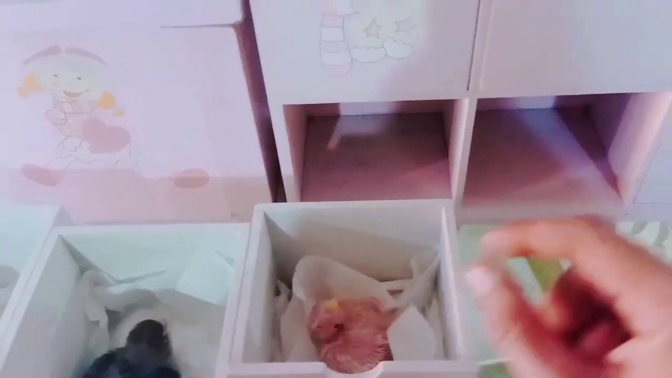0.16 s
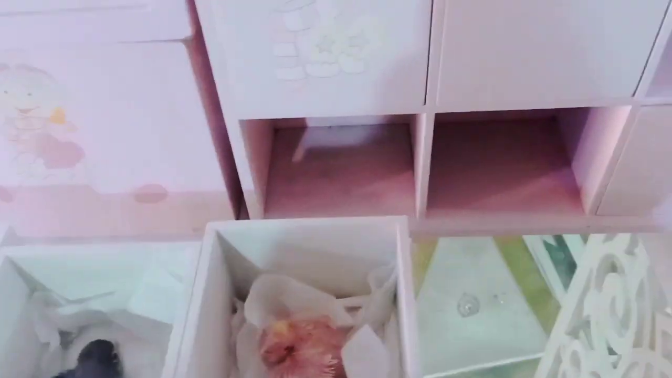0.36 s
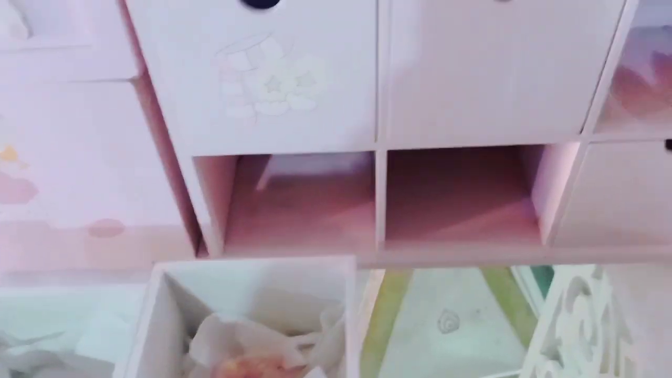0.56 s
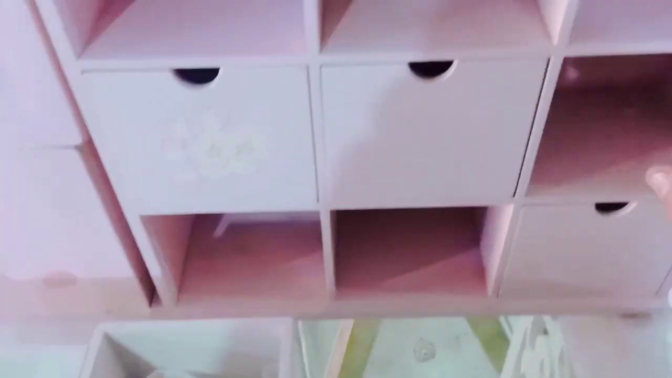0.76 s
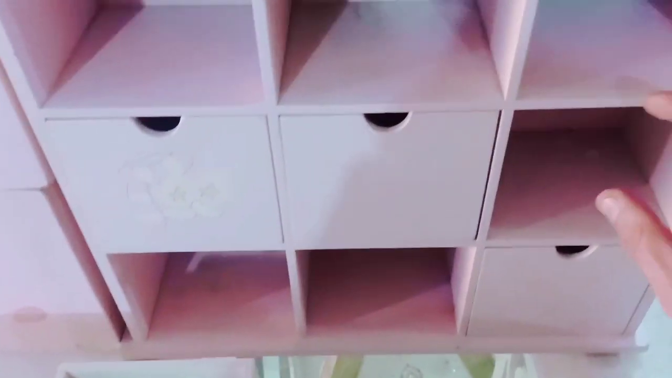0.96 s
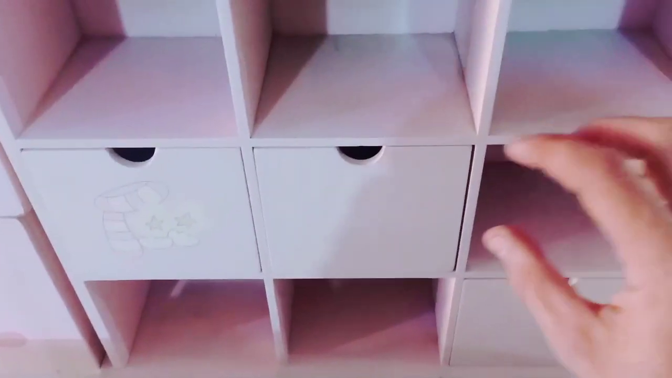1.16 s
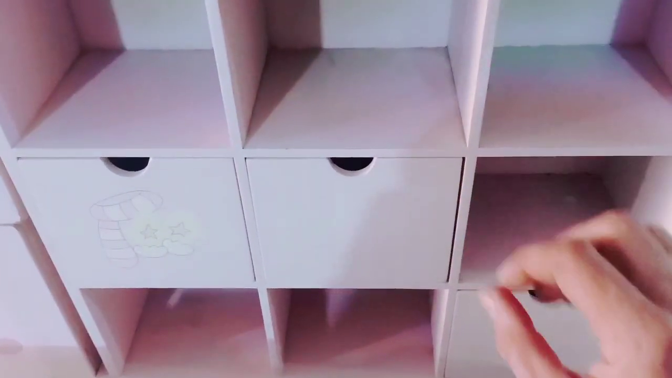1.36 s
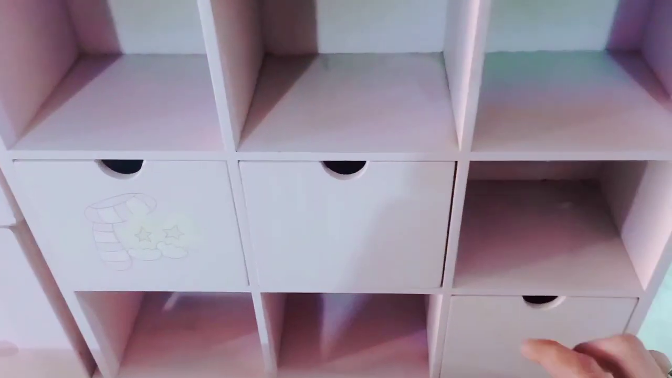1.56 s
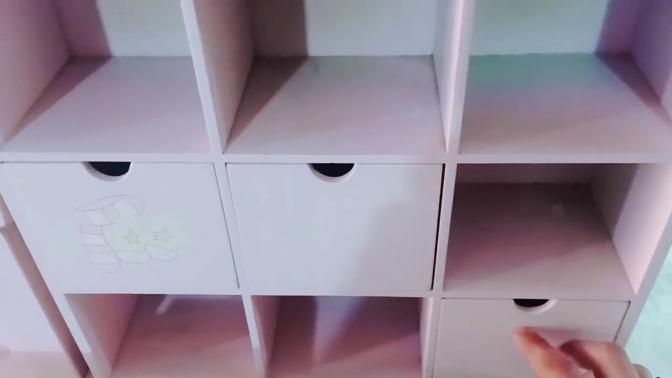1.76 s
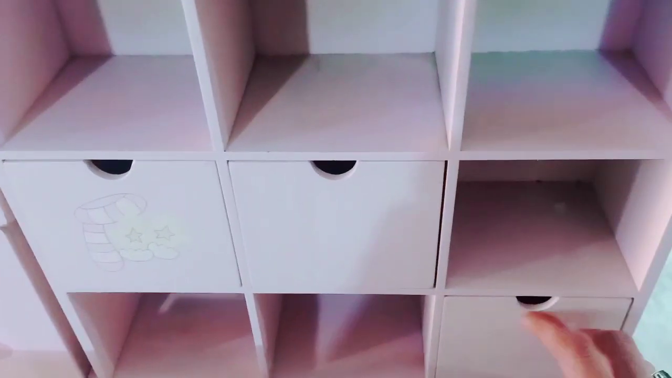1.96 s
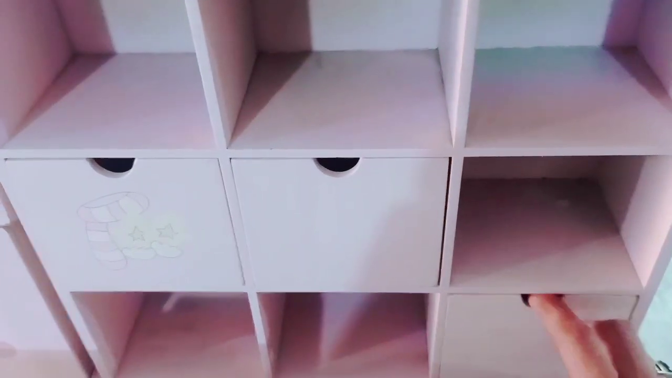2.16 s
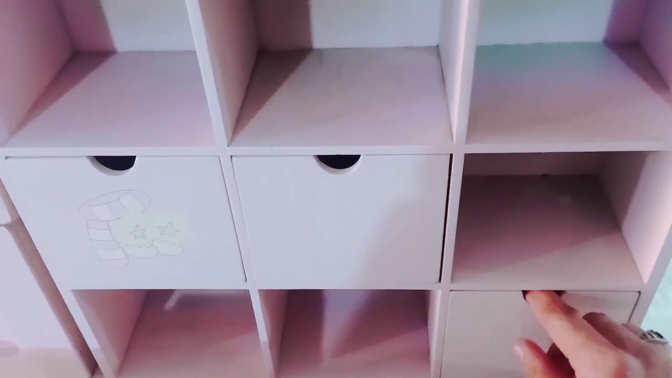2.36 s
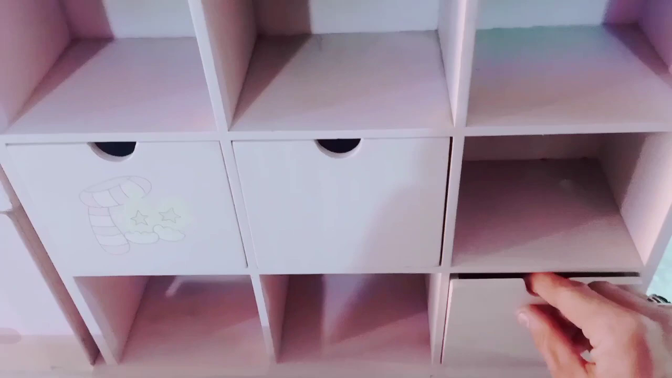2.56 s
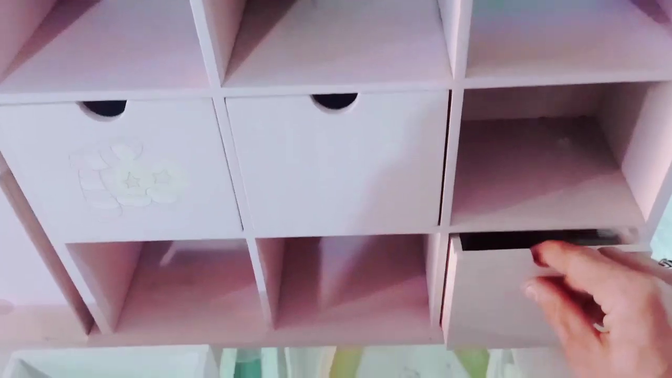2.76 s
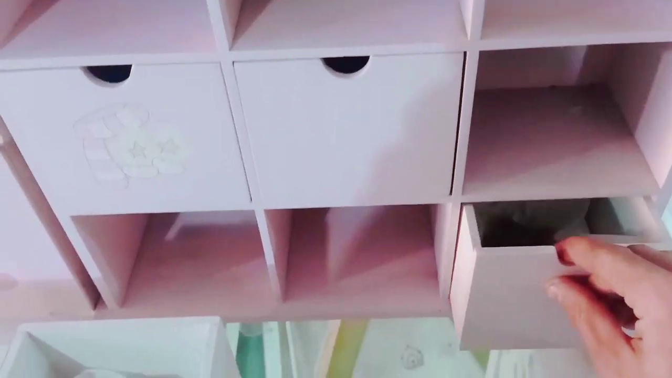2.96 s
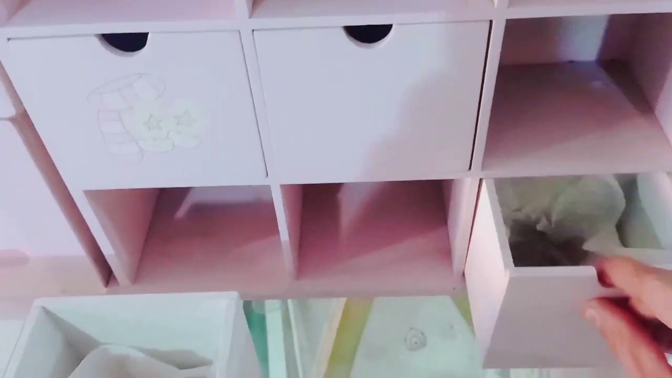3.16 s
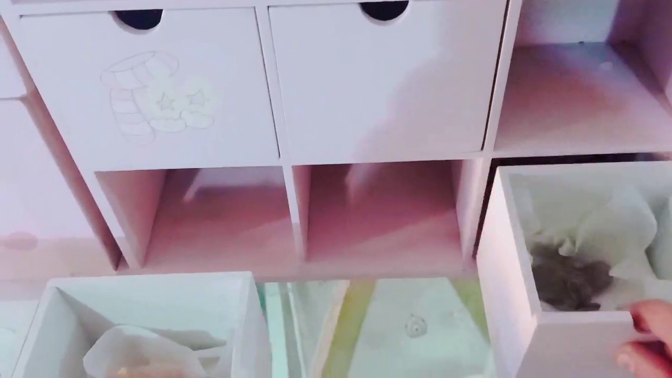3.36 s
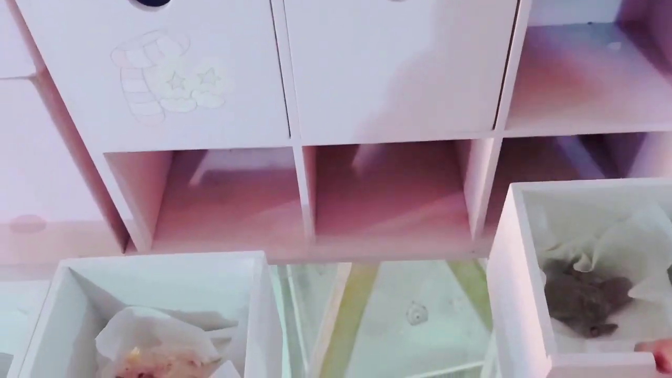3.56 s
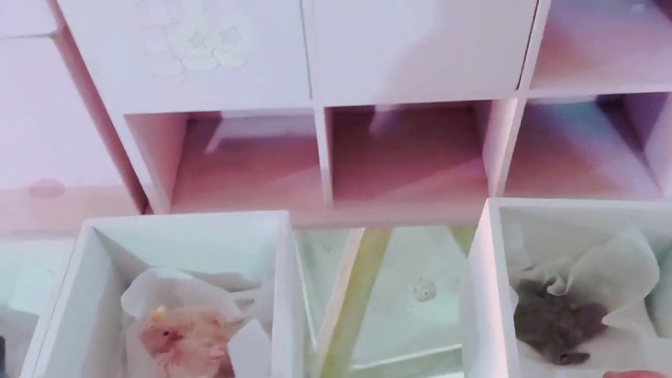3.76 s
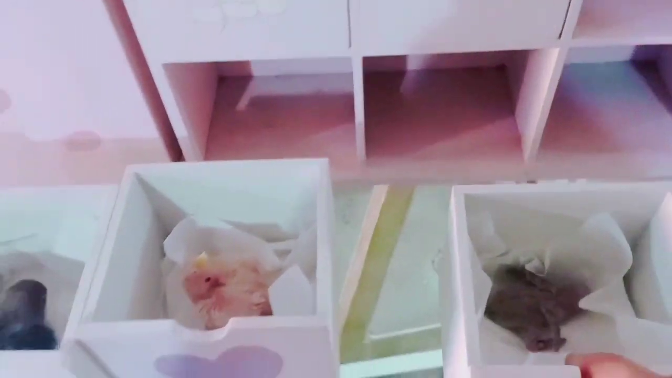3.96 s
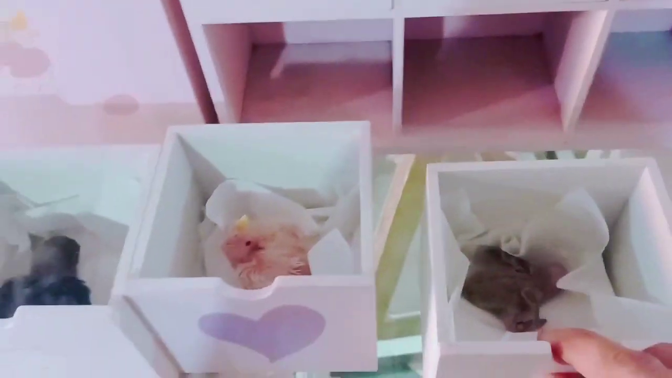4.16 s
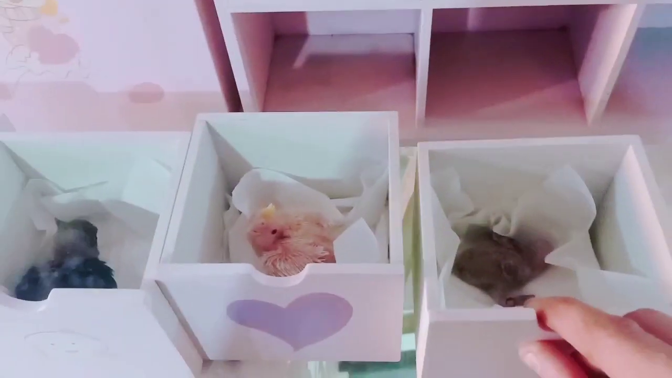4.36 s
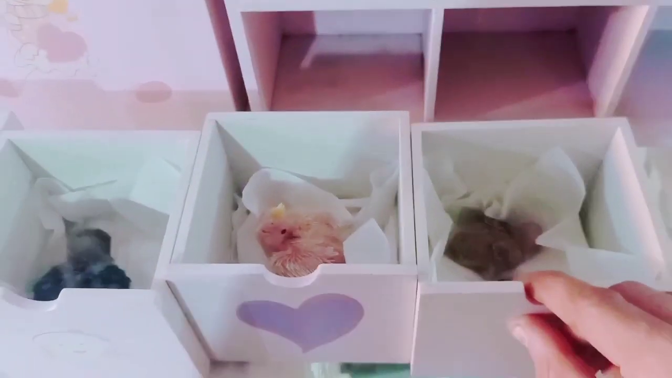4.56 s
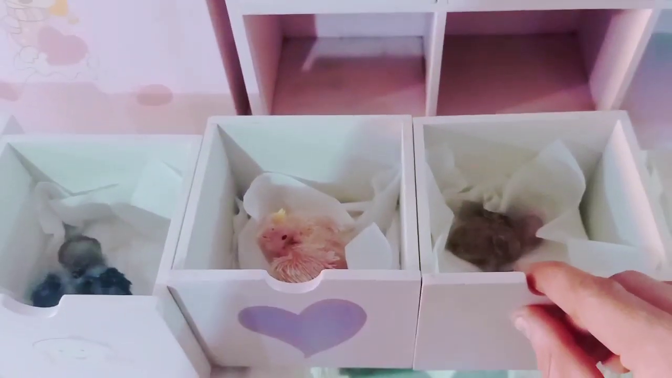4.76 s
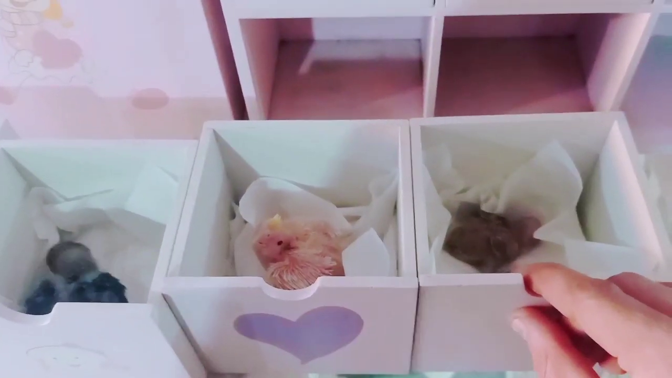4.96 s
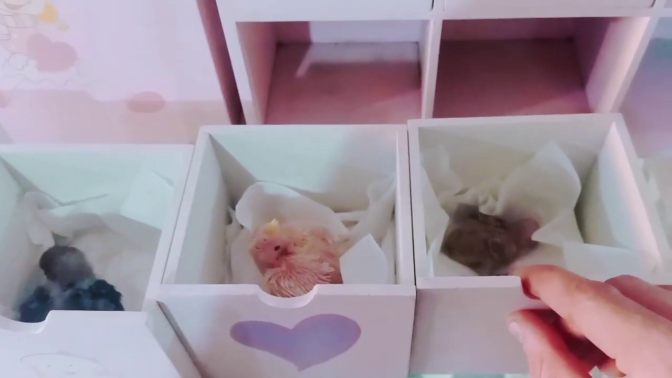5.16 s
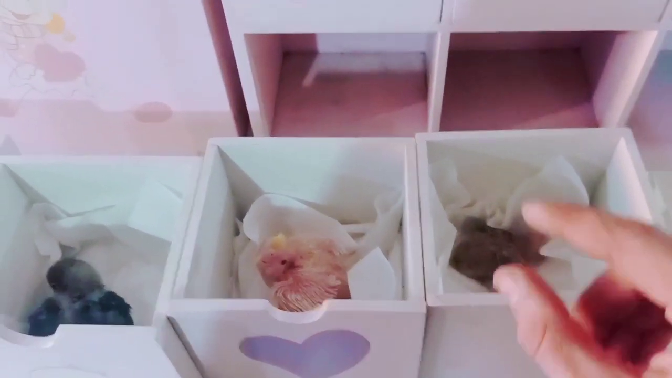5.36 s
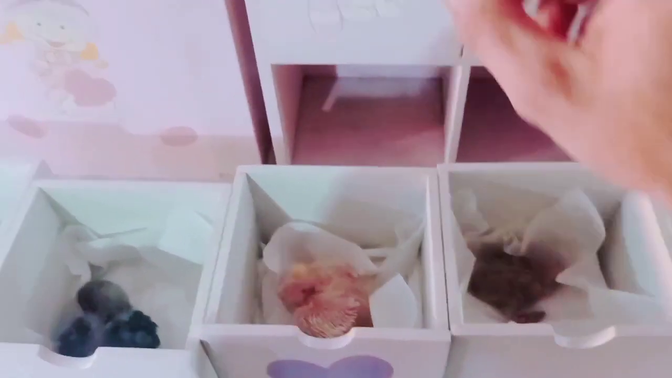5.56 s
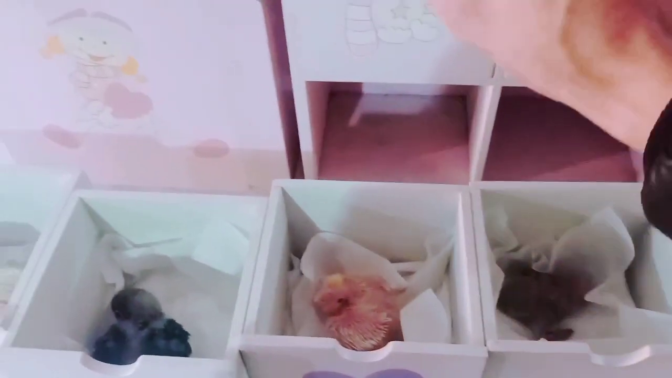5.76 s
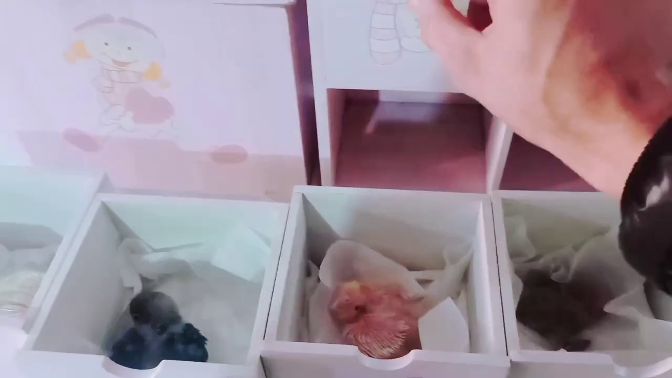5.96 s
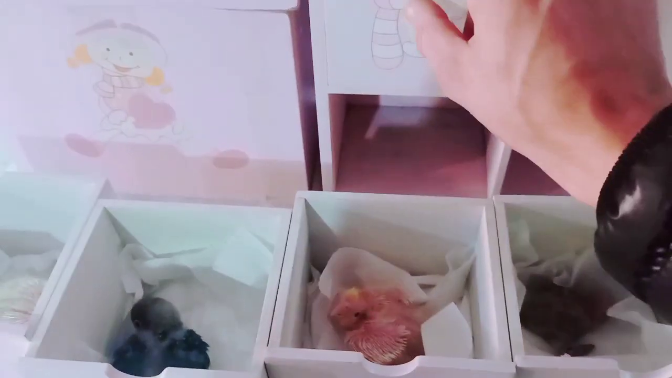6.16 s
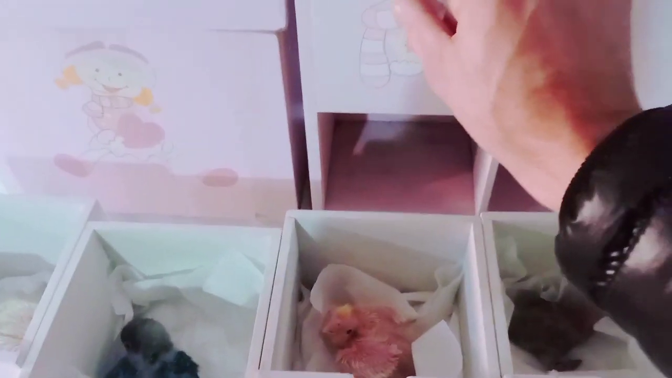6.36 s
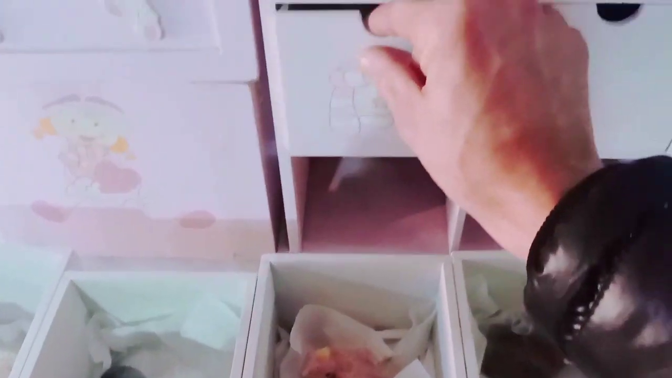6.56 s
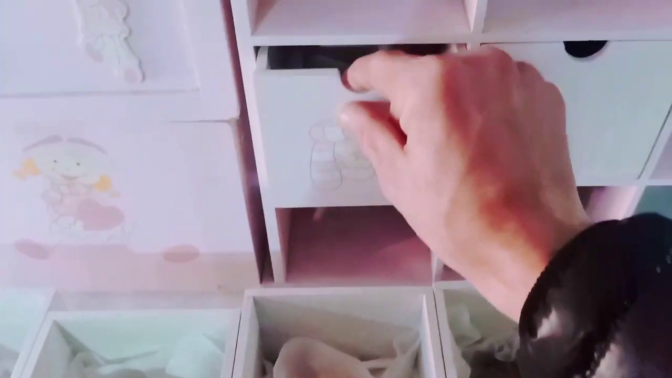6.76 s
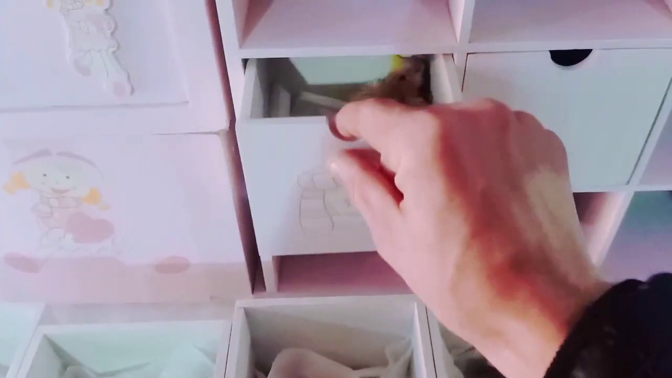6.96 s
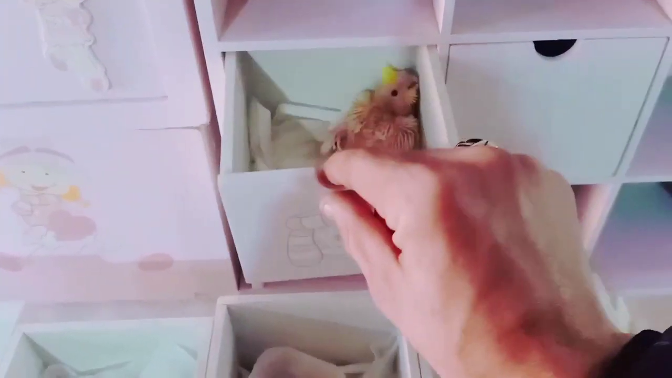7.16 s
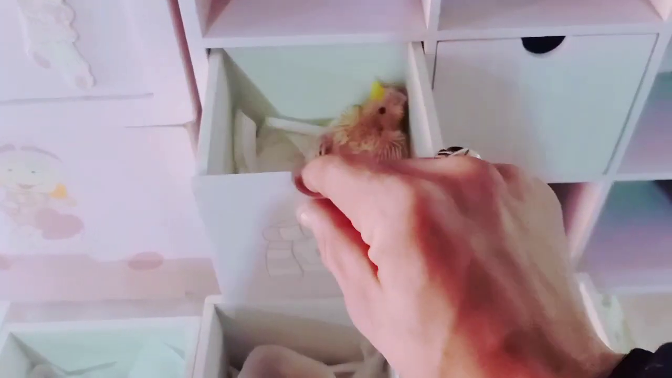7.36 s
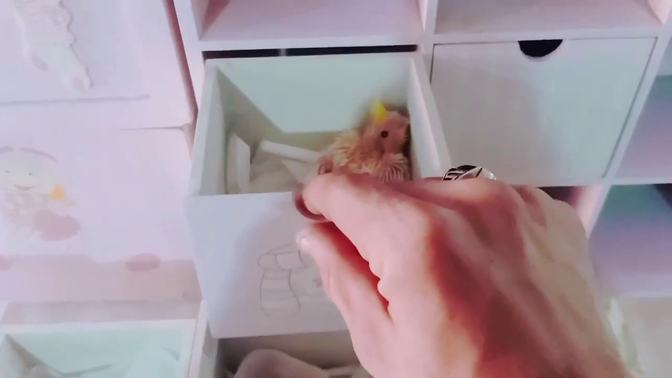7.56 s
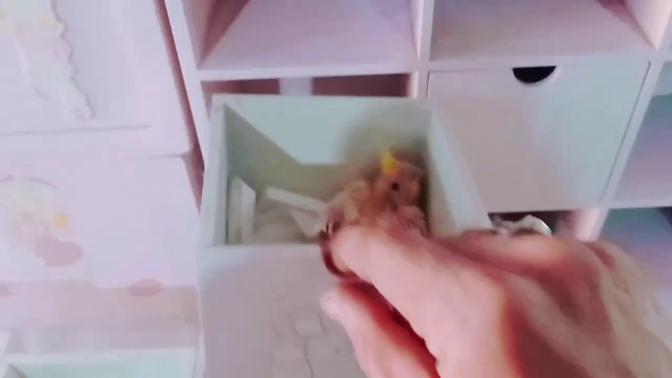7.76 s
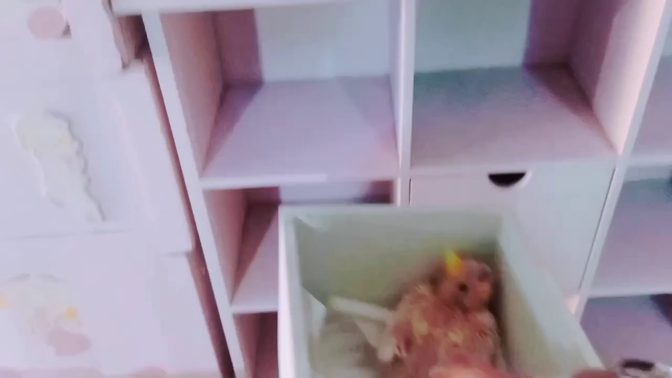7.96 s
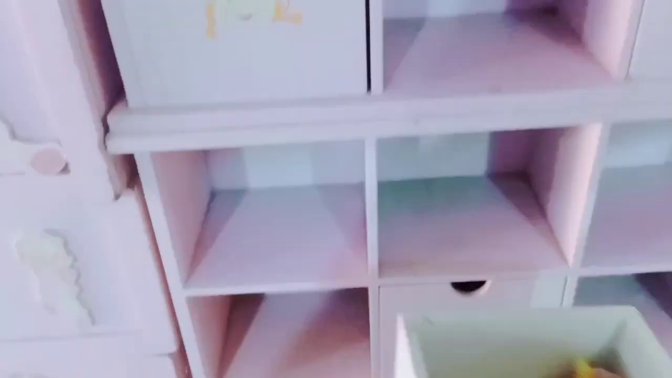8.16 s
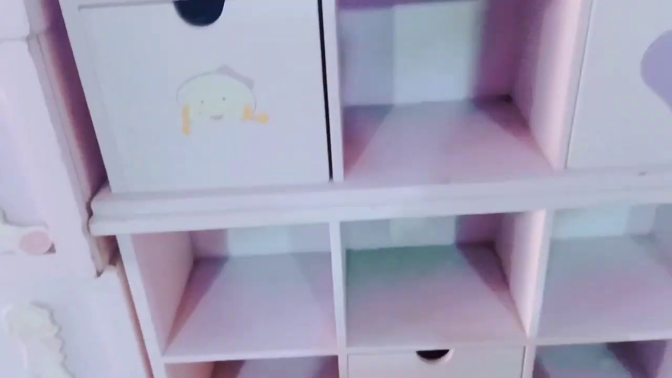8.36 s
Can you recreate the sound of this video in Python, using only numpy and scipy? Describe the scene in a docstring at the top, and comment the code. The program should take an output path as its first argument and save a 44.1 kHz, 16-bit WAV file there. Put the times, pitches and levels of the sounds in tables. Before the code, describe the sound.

In a quiet, hissing room, a padded sleeve swishes close by. A small wooden drawer is tugged with hollow knocks, scrapes out of its cabinet, lands with a sharp clack and is rubbed and bumped along beside others. After a lull with ticks and a fingertip creak, an upper drawer jerks free with a knock and rough scraping. Close stereo microphone.

```python
"""A padded sleeve swishes over the hiss of a quiet room, with a faint falling whistle and a brief soft hoot.
A hand jerks a small wooden drawer out of a toy cabinet with knocks; it scrapes out, tips over the edge,
lands and is pushed along beside the others, ticking. A fingertip then creaks and an upper drawer is pulled out.
Knocks and ticks are decaying modes, scrapes are random clicks that ring the panels, and the creak is
a train of damped slips; the swishes, drags, whistles and room are shaped noise."""
import sys
import numpy as np
from scipy import signal
from scipy.fft import rfft, irfft
from scipy.io import wavfile

SR = 44100
rng = np.random.default_rng(int(sys.argv[2]) if len(sys.argv) > 2 else 0)


def master(y):
    """Save y as 16-bit WAV."""
    cut = np.clip(np.atleast_2d(y).T, -1, 1)
    pcm = np.round(cut * 32767)  # scale
    wavfile.write(sys.argv[1], SR, pcm.astype(np.int16))


N = 370881
TIME = np.arange(N) / SR
RING_TIME = TIME[:SR // 3]


# what the cabinet round the lower drawer rings with: pitch_hz, level_db, t60_s
CABINET = [(263.4, 3, 0.23), (285, 7, 0.087), (316, -6, 0.44), (508, -2.5, 0.2), (593, -10, 0.22),
           (860, 1.5, 0.035), (1032, 3.5, 0.04), (1453, -5, 0.062), (1815, -0.5, 0.094), (2230, -2, 0.052),
           (2770, -5, 0.071), (3650, -8, 0.026), (6450, 8.5, 0.029)]
# knocks on it: start_s, level_db, hardness_db_per_octave, ring_length_factor, extra_thud_db
CABINET_KNOCKS = [(2.191, -30, -2.16, 0.4, -1.5), (2.711, -25.5, -7, 0.91, 4.5),
                  (2.735, -27.5, -9.5, 1.1, -3), (2.817, -37.5, -3.5, 0.93, 12), (2.868, -52, -15, 1.2, 0),
                  (3.196, -47.5, -5.5, 1.5, 8.5), (3.354, -27, -4, 1.07, 6)]
# how a blow of hardness 0 divides: level_db of thud, knock, clack and tick
CABINET_VOICE = [-12.5, -1, 1.5, -1]


def cabinet_knocks():
    """Blows ring the cabinet's modes, the lowest of them as a boom."""
    def response(ring):
        """One blow on the cabinet."""
        return body(CABINET, ring, dense_db=-3.0, dense_t60=0.051, room_db=-22.5)
    return blows(CABINET_KNOCKS, response, CABINET_VOICE, pan_db=-7.0, attack_s=0.0013)


# what a loose drawer rings with: pitch_hz, level_db, t60_s
LOOSE_DRAWER = [(148, -13.5, 0.046), (312.6, -13.5, 0.15), (569, -8.5, 0.037), (740, 1.5, 0.06),
                (829, 3.5, 0.073), (1021, -2.5, 0.04), (1450, 4, 0.014), (1628, -0.5, 0.076),
                (1794, 3, 0.03), (2160, -8.5, 0.06), (2500, -12, 0.049), (3710, -10.5, 0.032),
                (6440, -21, .02)]
# knocks on it: start_s, level_db, hardness_db_per_octave, ring_length_factor, extra_thud_db
DRAWER_KNOCKS = [(2.131, -43.5, -1.5, 2.9, 9), (3.9598, -14.5, -4, 0.87, -2.5), (4.1165, -35.5, -3, 0.8, 0),
                 (4.207, -35.5, -5.5, 0.83, 5), (4.279, -42.5, 2.5, 1.1, 8), (4.424, -42.5, 1.5, 0.74, 14),
                 (4.6635, -23.5, -7, 0.6, -15), (4.668, -24.5, -12, 0.41, -13.5), (4.793, -53, 5, 0.4, 4)]
# how a blow of hardness 0 divides: level_db of thud, knock, clack and tick
DRAWER_VOICE = [-18, -1, -1.5, -23]


def loose_drawer_knocks():
    """The loose drawer bumps and lands on the shelf, ringing its own small box."""
    def response(ring):
        """One blow on the loose drawer."""
        return body(LOOSE_DRAWER, ring, dense_db=-11.5, dense_t60=0.03, room_db=-16.5)
    return blows(DRAWER_KNOCKS, response, DRAWER_VOICE, pan_db=-4.5, attack_s=0.00087)


# what the upper drawer in its slot rings with: pitch_hz, level_db, t60_s
UPPER_DRAWER = [(194, -6.5, 0.24), (265.4, 10.5, 0.067), (333.8, 5.5, 0.12), (503, -2, 0.046),
                (612.4, 12.5, 0.049), (1200, 6.5, 0.016), (1500, 3.5, 0.041), (2122, 5, 0.042),
                (2700, -2, 0.023), (3687, 10, 0.014), (6560, -5, 0.11)]
# knocks on it: start_s, level_db, hardness_db_per_octave, ring_length_factor, extra_thud_db
UPPER_KNOCKS = [(6.048, -45, -2.5, 1.8, 1.5), (6.146, -46, -3.5, 3.8, -13), (6.6628, -18.5, -5.5, 1.7, -6),
                (6.870, -25.5, -15, 1.1, -25.5), (7.135, -43, -0.5, 0.8, -4), (7.182, -35.5, 0.5, 0.63, 8),
                (7.315, -34, -14, 0.57, -16), (7.436, -27, -4, 2.1, 0.5)]
# how a blow of hardness 0 divides: level_db of thud, knock, clack and tick
UPPER_VOICE = [-10, -2, -2.5, -6]


def upper_drawer_knocks():
    """Blows as the upper drawer jerks free ring its modes in the slot."""
    def response(ring):
        """One blow on the upper drawer."""
        return body(UPPER_DRAWER, ring, dense_db=-7.0, dense_t60=0.067, room_db=-10.5)
    return blows(UPPER_KNOCKS, response, UPPER_VOICE, pan_db=-8.0, attack_s=0.00054)


# how hard wood rubs on wood as the lower drawer comes out: start_s, level_db
LOWER_PULL = [(2.72, -50), (2.77, -42), (2.82, -38), (2.86, -54), (2.92, -45.5), (3.03, -45), (3.10, -46.5),
              (3.16, -43.5), (3.22, -57), (3.26, -43), (3.30, -57), (3.35, -42)]
# balance along the travel, a row each for rumble, rasp and grit: first_db, last_db
LOWER_SHIFT = [(-1.5, 0), (0.5, -2), (-10.5, -8)]


def lower_pull():
    """The lower drawer sounds its own box together with the boom of the cabinet's lowest modes."""
    boom = [mode for mode in CABINET if mode[0] < KNOCK_EDGES_HZ[1]]
    return slide(LOWER_PULL, LOWER_SHIFT, boom + LOOSE_DRAWER, pan_db=-14.0, dense_db=-1.5,
                 catches_hz=800, uneven_db=3, judder_db=4.5)


# how hard the lower drawer scrapes as it tips over the cabinet's edge: start_s, level_db
EDGE_SCRAPE = [(3.36, -38), (3.39, -34.5), (3.42, -34), (3.485, -36), (3.52, -55)]
# balance along the travel, a row each for rumble, rasp and grit: first_db, last_db
EDGE_SHIFT = [(-13, -7.5), (-2, -1.5), (-10.5, -5.5)]


def edge_scrape():
    """The tipping drawer scrapes the cabinet and rings its modes."""
    return slide(EDGE_SCRAPE, EDGE_SHIFT, CABINET, pan_db=-10.0, dense_db=-2,
                 catches_hz=1135, uneven_db=-2.5, judder_db=2.5, count=4)


# how hard the loose drawer rubs along the shelf: start_s, level_db
SHELF_PUSH = [(4.03, -52), (4.085, -48.5), (4.11, -46.5), (4.135, -47.5), (4.19, -49), (4.272, -53),
              (4.29, -41.5), (4.40, -44.5), (4.47, -58.5), (4.55, -49.5), (4.58, -42.5), (4.655, -49),
              (4.685, -36), (4.728, -40), (4.79, -76), (4.84, -48.5), (4.95, -67)]
# balance along the travel, a row each for rumble, rasp and grit: first_db, last_db
SHELF_SHIFT = [(-1.5, -1), (6.5, -9), (-11.5, -5)]


def shelf_push():
    """Rubbing along the shelf rings the loose drawer."""
    return slide(SHELF_PUSH, SHELF_SHIFT, LOOSE_DRAWER, pan_db=-7.5, dense_db=-2.0,
                 catches_hz=1260, uneven_db=4.5, judder_db=4.0)


# how hard the upper drawer rubs as it comes out: start_s, level_db
UPPER_PULL = [(6.668, -41), (6.72, -41.5), (6.82, -36), (6.895, -53.5), (6.95, -37), (7.0, -46.5),
              (7.06, -38.5), (7.11, -45.5), (7.17, -33.5), (7.25, -39.5), (7.30, -45), (7.35, -50.5),
              (7.40, -43.5), (7.43, -40), (7.455, -40.5), (7.49, -43), (7.745, -44.5), (7.78, -60)]
# balance along the travel, a row each for rumble, rasp and grit: first_db, last_db
UPPER_SHIFT = [(-2, 3.5), (-0.5, 2), (-6, -9)]


def upper_pull():
    """Rubbing in the slot rings the upper drawer."""
    return slide(UPPER_PULL, UPPER_SHIFT, UPPER_DRAWER, pan_db=-8.0, dense_db=-1.0,
                 catches_hz=1305, uneven_db=2.5, judder_db=2.5)


# narrow bands in which the rubbing wood sings: start_s, length_s, first_hz, last_hz, level_db
SONGS = [(2.86, 0.42, 767, 872, -45.5), (2.99, 0.23, 1775, 1855, -45.5), (3.36, 0.13, 985, 1130, -38.5),
         (3.41, 0.091, 2360, 2200, -36.5), (4.28, 0.13, 1693, 1670, -43.5), (6.97, 0.14, 2450, 2430, -43),
         (7.36, 0.26, 2470, 2490, -44.5)]


def singing():
    """Rubbing wood sings in narrow, wavering bands that glide in pitch."""
    return whistle(SONGS, width_hz=76, rise=0.77, fall=0.13, bend=0.85)


# the drawer's bottom panel groans where the hand bears down: start_s, length_s, pitch_hz, level_db
GROANS = [(3.368, 0.16, 290, -43), (4.319, 0.088, 304.6, -48.5), (4.54, 0.046, 325, -50),
          (4.83, 0.152, 326, -58), (7.14, 0.142, 310, -38), (7.53, 0.26, 335, -41)]


def groans():
    """The rubbing drives the lowest resonance of the drawer's bottom panel."""
    steady = [(s, length, hz, hz, db) for s, length, hz, db in GROANS]
    return whistle(steady, width_hz=48, rise=0.44, fall=0.28, pan_db=-1)


# ticks of fingernails, paper lining and drawer edges:
# start_s, level_db, hardness_db_per_octave, ring_length_factor, pitch_hz
TICKS = [(3.055, -43, -1, 0.54, 2480), (3.068, -53, 6, 0.66, 1750), (3.196, -38, -4, 1, 2520),
         (3.233, -36, -3, 1.6, 2790), (3.314, -36, -1, 1, 2780), (3.388, -31, -4, 0.84, 2900),
         (4.152, -35, -0.5, 1.4, 2970), (4.382, -57, 5, 0.68, 1680), (4.391, -55, 6.5, 0.61, 1680),
         (4.717, -49, 2, 0.5, 2880), (4.827, -49, 0, 1.3, 1630), (5.030, -52.5, 4, 0.7, 1940),
         (5.049, -49, 3, 1.04, 1670), (5.188, -48.5, -1.5, 0.64, 1610), (5.401, -41, 0.5, 1.33, 1670),
         (5.995, -32, -2.5, 1.6, 2514), (6.783, -37.5, 2, 1.7, 2450), (7.900, -39, -1.5, 1.4, 1620),
         (8.277, -37, -1.5, 1.7, 1640)]
# how a flick of hardness 0 divides, without a thud: level_db of knock, clack and tick
EDGE_VOICE = [-10, 0, -4.5]
# ring of a flicked edge at its own pitch: level_db, t60_s
EDGE_RING = (22.2, 0.019)
# its thin click: pitch_hz, level_db, t60_s
EDGE_CLICK = (6400, 20, 0.02)


def ticks():
    """Light contacts on an edge, each with its own pitch; the longer ones are scuffs that build up gradually."""
    def flick(ring, hz):
        """One contact, slower to build the longer it rings."""
        modes = [(hz, *EDGE_RING), EDGE_CLICK]
        sound = body(modes, ring, dense_db=0, dense_t60=0.039, room_db=-33.0, room_t60=0.39)
        return sound * (1 - np.exp(-RING_TIME / (0.0026 * ring ** 3)))

    out = 0
    for *row, hz in TICKS:
        out = out + blows([row], lambda ring: flick(ring, hz), EDGE_VOICE, pan_db=-6.5, attack_s=0.0001)
    return out


# a fingertip sticks and slips on the drawer front, faster as the pull builds
CREAK_START_S, CREAK_LENGTH_S, CREAK_DB = 6.225, 0.41, -48
CREAK_FIRST_HZ, CREAK_FULL_HZ, CREAK_BUILD_S = 36.1, 142, 0.11


def creak(jitter=0.14, low_hz=270, high_hz=570, scuff=0.38):
    """Uneven slips of a soft fingertip, each a dull, damped tap with a little scuffing after it."""
    slack = np.exp(-np.maximum(TIME - CREAK_START_S, 0) / CREAK_BUILD_S)
    rate = CREAK_FULL_HZ + (CREAK_FIRST_HZ - CREAK_FULL_HZ) * slack
    cycles = np.cumsum(rate * np.exp(jitter * walk(180, N))) / SR
    # one impulse each time a cycle completes
    slips = np.diff(np.floor(cycles), prepend=0) * undb(1.5 * walk(140, N))
    rub = rng.standard_normal(N) * np.exp(-2 * (cycles % 1))
    taps = band(slips / slips.std() + scuff * rub / rub.std(), low_hz, high_hz, order=3)
    gain = undb(CREAK_DB) * envelope(CREAK_START_S, CREAK_LENGTH_S, rise=0.19, fall=0.59)
    return unit(np.array([taps, taps])) * gain


# dull drags of the hand on the wood: start_s, length_s, level_db
HAND = [(2.5, 0.2, -53.5), (5.88, 0.93, -56.5), (6.43, 1.62, -59), (7.7, 1.6, -54)]


def hand(low_hz=135, high_hz=260, uneven_db=5):
    """Skin drags on the panels with a soft, uneven rumble."""
    drags = sum(undb(db) * envelope(s, length, rise=0.26, fall=0.31) for s, length, db in HAND)
    rumble = band(noise(ROOM, N), low_hz, high_hz)
    return unit(rumble * undb(uneven_db * walk(25, N))) * drags


# swishes of the sleeve, one per arm movement: start_s, length_s, level_db, treble_db
SLEEVE = [(-0.06, 0.85, -51.5, 5.5), (0.595, 0.9, -53, 0.5), (1.399, 0.27, -51.5, 8),
          (1.64, 0.4, -52.5, 3.5), (2.211, 0.25, -44, -1), (2.372, 0.34, -47, 5), (2.73, 1.7, -47, 0),
          (4.072, 0.89, -46, 4), (5.357, 0.55, -46.5, 7), (5.635, 0.88, -52.5, -4), (6.095, 1.04, -51, -2),
          (7.555, 0.92, -45, 1.5), (8.15, 0.8, -48.5, -6)]
# spectrum of the fabric: pitch_hz, level_db_per_hz
CLOTH = [(150, -11), (330, -4), (700, 0.5), (1300, -4.5), (2000, 1), (2600, 3), (3300, -3), (4300, -10.5),
         (5500, -8.5), (6700, -8.5), (7500, -16.5), (8500, -32.5), (15000, -34)]
SLEEVE_TREBLE_HZ = 3860
FLUTTER_DB = 1.3  # spread of the slower waver in level


def sleeve(rest_db=-61, grain_db=1.4, pan_db=-4, rise=0.45, fall=0.76):
    """Smooth fabric rubs on itself, swelling and fading with each move of the arm."""
    body_power = treble_power = undb(rest_db) ** 2
    for s, length, db, treble_db in SLEEVE:
        swish = undb(db) * envelope(s, length, rise, fall)
        body_power = body_power + swish ** 2
        treble_power = treble_power + (swish * undb(treble_db)) ** 2
    cloth = unit(place(noise(CLOTH, N), pan_db))
    highpass = signal.butter(3, SLEEVE_TREBLE_HZ, "highpass", fs=SR, output="sos")
    treble = signal.sosfiltfilt(highpass, cloth)
    weave = undb(FLUTTER_DB * walk(25, N) + grain_db * walk(540, N))
    return ((cloth - treble) * np.sqrt(body_power) + treble * np.sqrt(treble_power)) * weave


# a faint, airy falling whistle: start_s, length_s, first_hz, last_hz, level_db
WHISTLE = [(0.62, 1.58, 1356, 800, -56.5)]


def falling_whistle():
    """A narrow band of noise glides down and levels off."""
    return whistle(WHISTLE, width_hz=74, rise=0.83, fall=0.016, bend=1.65)


# a brief soft hoot: start_s, length_s, first_hz, last_hz, level_db
HOOT = [(1.115, 0.081, 567, 532, -52.5)]


def hoot():
    """A short, low band of noise sinks slightly in pitch."""
    return whistle(HOOT, width_hz=67, rise=0.65, fall=0.57)


# spectrum of the quiet room: pitch_hz, level_db_per_hz
ROOM = [(25, -23), (80, 3.5), (120, -2), (300, 1), (800, -10.5), (1300, -2.5), (2400, 4), (4500, -19),
        (6600, -6), (7500, -63), (8300, -69), (15000, -103)]


def room(level_db=-57.0, pan_db=-2):
    """Steady indoor hiss that wavers very slightly in level."""
    return unit(place(noise(ROOM, N), pan_db)) * undb(level_db + 0.33 * walk(2.1, N))


# spectrum of the crowd of weak wood modes and of the room's answer to a blow: pitch_hz, level_db_per_hz
WOOD = [(50, -42), (110, -43), (170, -57), (290, 2.5), (440, -7.5), (600, -3), (1100, -11), (1420, -16),
        (2500, -12.5), (4200, -21.5), (6700, -12), (7400, -23.5), (8400, -36), (15000, -61)]


def body(modes, ring, dense_db, dense_t60, room_db, room_t60=0.19, port_turn=0.96, wander=0.008):
    """Response to one blow: panel modes, a brief crowd of weaker modes, and the room."""
    chance = rng.standard_normal((len(modes), 3))
    panels = 0
    for (hz, db, t60), (detune, left, right) in zip(modes, chance):
        # short waves reach the two channels out of step
        turn = port_turn * min(hz / 1500, 2) * np.array([[left], [right]])
        wave = np.sin(2 * np.pi * hz * (1 + wander * detune) * RING_TIME + turn)
        # the lowest modes all start with the blow; the sign of the others depends on the spot
        sign = 1 if hz < KNOCK_EDGES_HZ[1] else np.sign(detune)
        panels = panels + sign * undb(db) * wave * fade(t60 * ring)
    crowd = noise(WOOD, len(RING_TIME)) * fade(dense_t60 * ring)
    tail = noise(WOOD, len(RING_TIME)) * fade(room_t60) * (1 - fade(0.014))
    return unit(panels) + undb(dense_db) * unit(crowd) + undb(room_db) * unit(tail)


# borders of thud, knock, clack and tick: edge_hz
KNOCK_EDGES_HZ = [90, 450, 1150, 3500, 18000]
KNOCK_PIVOT_HZ = 720  # hardness tilts the registers about this pitch


def blows(table, response, voice, pan_db, attack_s):
    """Each blow drives the registers of its object; a harder contact tilts them towards the treble."""
    out = np.zeros((2, N + len(RING_TIME)))
    edges = KNOCK_EDGES_HZ[-len(voice) - 1:]
    for s, level_db, hardness, ring, *thud_db in table:
        registers_db = [voice[0] + sum(thud_db), *voice[1:]]
        sound = place(response(max(ring, .1)), pan_db) * (1 - np.exp(-RING_TIME / attack_s))
        start = int(s * SR)
        for db, low, high in zip(registers_db, edges, edges[1:]):
            part = band(sound, low, high, order=3)
            # the level holds for the first 1/80 s
            first = np.sqrt(np.mean(part.mean(0)[:SR // 80] ** 2))
            octaves = np.log2(np.sqrt(low * high) / KNOCK_PIVOT_HZ)
            gain = undb(level_db + db + hardness * octaves)
            out[:, start:start + len(RING_TIME)] += part / first * gain
    return out[:, :N]


# borders of rumble, rasp and grit: edge_hz
SLIDE_EDGES_HZ = [120, 700, 3500, 9500]
# harder rubbing changes the balance of rumble, rasp and grit: growth_db_per_db of each
RUB_GROWTH = [0.8, 1, 0.96]
ORDINARY_RUB_DB = -35.5  # the rub at which that growth changes nothing
GRIP_WANDER = 0.04  # spread of the modes from spot to spot, as a share of their pitch


def slide(table, shift, modes, pan_db, dense_db, catches_hz, uneven_db, judder_db, count=9):
    """Wood fibres catch and let go at random; the dense clicks ring the panels."""
    s, rub_db = np.transpose(table)
    start = int(s[0] * SR)
    time = TIME[start:int(s[-1] * SR)]
    size = len(time)
    catches = (rng.random(size) < catches_hz / SR) * rng.choice([-1, 1], size)
    catches = catches * undb(uneven_db * rng.standard_normal(size))
    catches = catches * undb(judder_db * walk(71.5, size))
    # the contact travels along the wood, and every spot rings the panels in its own mix
    travel, sound = np.linspace(0, count - 1, size), 0
    for spot in range(count):
        nearness = np.sqrt(np.maximum(1 - np.abs(travel - spot), 0))
        # the grip of the hand shortens the ring and shifts the modes
        response = body(modes, 0.97, dense_db, dense_t60=0.08, room_db=-6.0, wander=GRIP_WANDER)
        response = place(response, pan_db)
        sound = sound + signal.fftconvolve((catches * nearness)[None], response, axes=1)[:, :size]
    out = np.zeros((2, N))
    for k, (growth, ends_db) in enumerate(zip(RUB_GROWTH, shift)):
        balance_db = np.interp(s, s[[0, -1]], ends_db)
        db = ORDINARY_RUB_DB + growth * (rub_db - ORDINARY_RUB_DB) + balance_db
        part = unit(band(sound, *SLIDE_EDGES_HZ[k:k + 2]))
        out[:, start:start + size] += part * swell(s, db, time)
    return out


def whistle(table, width_hz, rise, fall, bend=1, pan_db=-5, uneven_db=2):
    """Narrow bands of noise that waver in level and glide in pitch; with a bend over 1 the glide levels off."""
    out = 0
    for s, length, first_hz, last_hz, db in table:
        left = np.clip(1 - (TIME - s) / length, 0, 1)
        phase = 2 * np.pi * np.cumsum(last_hz + (first_hz - last_hz) * left ** bend) / SR
        tone = walk(2 * width_hz, N) * np.sin(phase) + walk(2 * width_hz, N) * np.cos(phase)
        panned = tone * undb(np.array([[pan_db], [-pan_db]]) / 2)
        out = out + unit(panned) * undb(db) * envelope(s, length, rise, fall)
    return out * undb(uneven_db * walk(14, N))


# how much the two channels differ in fine detail: pitch_hz, side_minus_mid_db
SPREAD = [(40, -10), (250, -10), (600, -2), (1500, 2), (4000, -0.5)]


def noise(points, size):
    """Coloured stereo noise, most alike in the bass."""
    mid, side = rng.standard_normal((2, size))
    side = colour(side, SPREAD)
    return unit(colour(np.array([mid + side, mid - side]), points))


# how the left channel is shaded from the cabinet: pitch_hz, share_of_left_right_difference
SHADE = [(250, -0.019), (700, 0.21), (1500, 1.2), (6000, 1.42), (8500, 0.66), (12000, -1.3)]


def place(x, pan_db):
    """Shade one channel; the bass bends round to both."""
    return colour(x, SHADE, np.array([[pan_db], [-pan_db]]) / 2)


def colour(x, points, scale=1):
    """Filter by a table of pitch_hz and level_db, its levels multiplied by scale."""
    size = x.shape[-1]
    return irfft(rfft(x) * undb(scale * at_hz(points, size)), size)


def at_hz(points, size):
    """A table over log frequency, read at the bins of a transform."""
    hz, value = np.transpose(points)
    return np.interp(np.log(np.fft.rfftfreq(size, 1 / SR) + 1), np.log(hz), value)


def band(x, low_hz, high_hz, order=3):
    """Causal band-pass."""
    sections = signal.butter(order, [low_hz, high_hz], "bandpass", fs=SR, output="sos")
    return signal.sosfilt(sections, x)


def envelope(start, length, rise, fall):
    """Smooth attack, hold and release; rise and fall are shares of the length."""
    done = (TIME - start) / length
    ramp = np.clip(np.minimum(done / max(rise, .01), (1 - done) / max(fall, .01)), 0, 1)
    return np.sin(np.pi / 2 * ramp)


def swell(s, db, time):
    """Gain along a dB curve, silent outside it."""
    return undb(np.interp(time, s, db)) * ((time >= s[0]) & (time <= s[-1]))


def fade(t60):
    """Exponential decay, down 60 dB after t60 seconds."""
    return np.exp(-np.log(1000) * RING_TIME / max(t60, .002))


def walk(rate, size):
    """Smooth chance with a spread near 1, drawing rate new values per second."""
    knots = rng.standard_normal(size // 8)
    return np.interp(np.arange(size) / SR * rate, np.arange(len(knots)), knots)


def unit(x):
    """Scale a stereo sound so that its middle has rms 1."""
    return x / np.sqrt(np.mean(x.mean(0) ** 2))


def undb(db):
    """Decibels to gain."""
    return 10 ** (np.asarray(db) / 20)


def scene():
    """Pull the lower drawer out over the cabinet's edge, push it along the shelf, pull the upper one."""
    struck = cabinet_knocks() + upper_drawer_knocks() + loose_drawer_knocks()
    scraped = lower_pull() + edge_scrape() + shelf_push() + upper_pull() + singing() + groans()
    fingers = ticks() + creak() + hand()
    background = sleeve() + falling_whistle() + hoot() + room()
    return struck + scraped + fingers + background


TOP_HZ = 15500


def record(dry):
    """A steep low-pass cuts the top."""
    return signal.sosfilt(signal.ellip(8, .2, 70, TOP_HZ, fs=SR, output="sos"), dry)


dry = scene()
out = record(dry)
master(out)
```